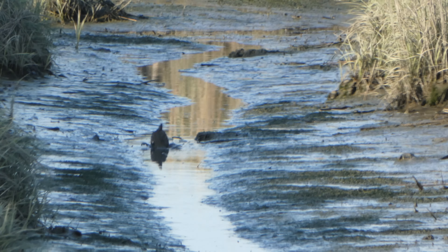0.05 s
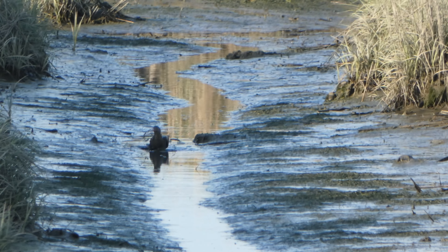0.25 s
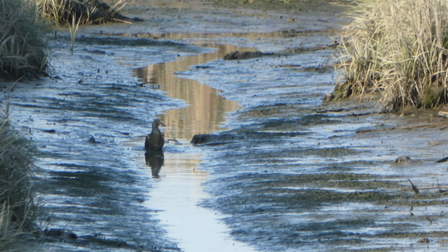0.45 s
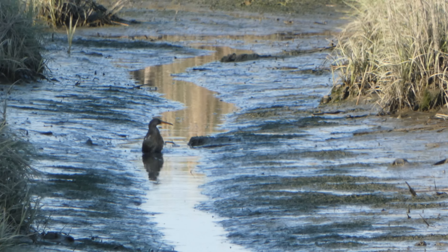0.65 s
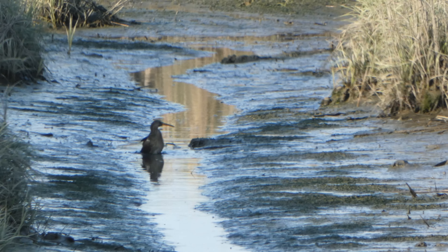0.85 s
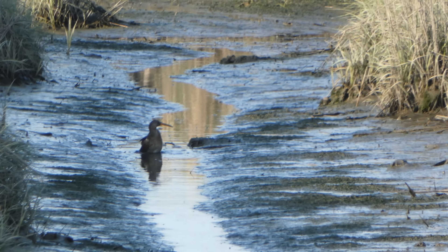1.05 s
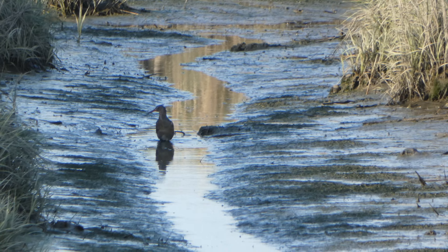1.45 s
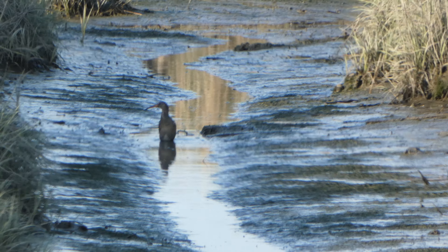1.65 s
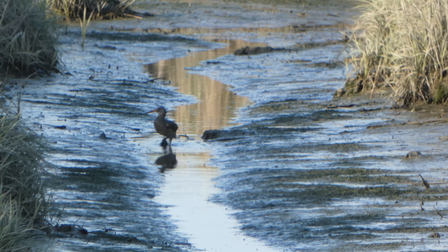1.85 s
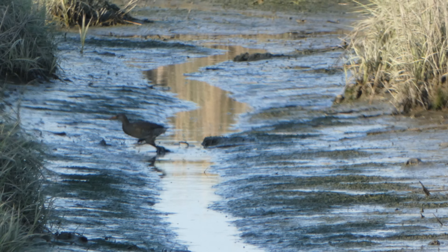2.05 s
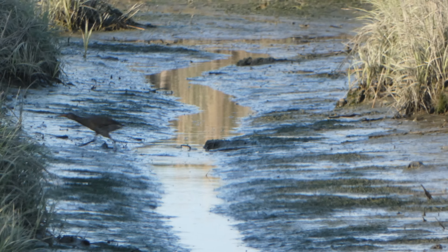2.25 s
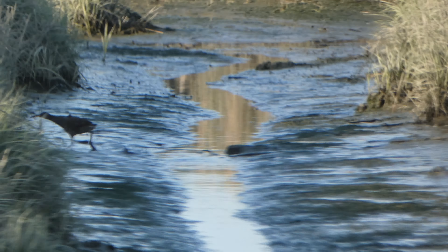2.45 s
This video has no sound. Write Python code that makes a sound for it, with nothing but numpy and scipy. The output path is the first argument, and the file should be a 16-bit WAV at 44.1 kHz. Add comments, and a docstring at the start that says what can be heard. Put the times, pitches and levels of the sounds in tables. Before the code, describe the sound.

High, clear bird whistles slide downward across a marsh, softly at first, then stronger after a spell of loud, lumpy wind on the microphone. Faint faraway calls, small nearby ticks and a soft distant rush lie behind.

```python
"""A tidal marsh, stereo microphone in the open, a soft rush in the distance throughout.
A bird opens with two thin, falling whistles that scatter off the banks; a few dry ticks sound close by.
Puffs of wind buffet the microphone, hardest around 1 s, and the recorder turns its gain down.
As the wind eases and the gain creeps back, fainter calls answer from afar.
The loudest whistle comes near 1.9 s, overlapped by a second, lower one; a last one follows at 2.4 s."""
import sys
import numpy as np
from scipy import signal
from scipy.fft import rfft, irfft, next_fast_len
from scipy.io import wavfile
from scipy.ndimage import uniform_filter1d, map_coordinates

SR = 44100
rng = np.random.default_rng(int(sys.argv[2]) if len(sys.argv) > 2 else 0)


def bounce(signal):
    """Save signal as a 16-bit WAV file at the path given by the first command-line argument."""
    frames = np.transpose(np.atleast_2d(signal))
    limited = np.clip(frames, -1, 1)
    pcm = np.round(limited * 32767).astype(np.int16)
    wavfile.write(sys.argv[1], SR, pcm)


N = 114660  # 2.6 s

WAVER_HZ, FLUTTER_DB = 16.25, 2.5  # unsteadiness of pitch and level
# Nearer whistles, one contour each; a second, lower whistle overlaps the loudest: t/s, f/Hz, level/dB
WHISTLE_CONTOURS = [
    [(0.0, 5420, -57.5), (.035, 5185, -55.5), (.14, 5004, -49), (.19, 4960, -52.5), (.26, 5104, -54.5),
     (.305, 5060, -66)],
    [(.355, 5310, -69), (.39, 5240, -62.5), (.445, 5050, -58), (.495, 4950, -76), (.535, 5040, -63.5),
     (.6, 5070, -84)],
    [(1.718, 6330, -60), (1.735, 6145, -65.5), (1.765, 5423, -47), (1.79, 5380, -59), (1.812, 5328, -40.5),
     (1.85, 5183, -50.5), (1.905, 5078, -39), (1.965, 5080, -39.5), (2.005, 5270, -53.5), (2.03, 5400, -56)],
    [(1.82, 5164, -54), (1.94, 4963, -49.5), (2.0, 4956, -52), (2.04, 4930, -69)],
    [(2.425, 5360, -67), (2.448, 5410, -53), (2.482, 5125, -64), (2.53, 5060, -55), (2.56, 5110, -54.5),
     (2.6, 5210, -56)],
]
# Where each whistle sits: left over right/dB
WHISTLE_PAN_DB = [3.5, 1.5, 1.5, -3, -6.5]
# Second and third harmonic, against the fundamental: level/dB
OVERTONES_DB = [-30, -39.5]


def whistles():
    """The nearer whistles: almost pure tones that fall, level out and mostly lift at the end."""
    out, t = np.zeros((2, N)), clock()
    for rows, pan_db in zip(WHISTLE_CONTOURS, WHISTLE_PAN_DB):
        hz, db = curves(rows)
        phase = phase_of(uniform_filter1d(hz, size=400) + WAVER_HZ * wobble(120))
        overtones = sum(amp(level) * np.sin(k * phase) for k, level in enumerate(OVERTONES_DB, 2))
        tone = np.sqrt(2) * (np.sin(phase) + overtones)
        gate = np.clip(np.minimum(t - rows[0][0], rows[-1][0] - t) / 0.0082, 0, 1)
        out += panned(tone * gate * amp(db + FLUTTER_DB * wobble(90)), pan_db)
    return out


# Puffs on the microphone: peak t/s, width/s, level/dB
PUFFS = [(0.066, 0.0081, -34.5), (0.239, 0.0067, -27.5), (0.274, 0.014, -27.5), (0.346, 0.026, -29),
         (0.392, 0.016, -29.5), (0.45, 0.025, -26.5), (0.525, 0.018, -22.5), (0.579, 0.025, -21),
         (0.652, 0.017, -20.5), (0.717, 0.048, -26.5), (0.85, 0.02, -24.5), (0.891, 0.022, -17),
         (0.935, 0.035, -23.5), (0.99, 0.032, -16), (1.044, 0.021, -16.5), (1.114, 0.025, -22.5),
         (1.205, 0.011, -31), (1.291, 0.019, -18), (1.333, 0.0087, -17.5), (1.404, 0.037, -30),
         (1.51, 0.013, -28.5), (1.653, 0.012, -25), (1.92, 0.016, -25.5), (1.97, 0.021, -34.5)]
# Low buffeting: f/Hz, density/dB
BUFFET_SPECTRUM = [(25, -42.5), (60, -7.5), (120, 3.5), (230, 0.5), (380, -8), (600, -29.5), (1000, -50.5),
                   (5000, -98.5)]
# Its stereo image: f/Hz, left-right correlation
BUFFET_IMAGE = [(60, 0.65), (150, 0.89), (300, 0.25), (600, 0.093), (1500, -0.94)]
# Brighter flurry in the strongest puffs: f/Hz, density/dB
FLURRY_SPECTRUM = [(200, -44.5), (400, 11.5), (600, 3.5), (1300, -15.5), (4000, -53)]
# Its stereo image: f/Hz, left-right correlation
FLURRY_IMAGE = [(500, -0.59)]


def wind(breeze_db=-53.5, rise_over_fall=0.77, flurry_growth=1.83):
    """Puffs of lumpy buffeting right on the microphone; the strongest turn brighter."""
    power = amp(breeze_db) ** 2
    for peak, width, level in PUFFS:
        u = (clock() - peak) / width
        power = power + amp(level) ** 2 * np.exp(-np.where(u < 0, u / rise_over_fall, u) ** 2)
    wind_db = 10 * np.log10(power)
    buffet = amp(wind_db + 2 * wobble(110)) * steadied(noise(BUFFET_SPECTRUM, BUFFET_IMAGE))
    flurry = unit(amp(3.3 * wobble(150)) * steadied(noise(FLURRY_SPECTRUM, FLURRY_IMAGE)))
    return buffet + panned(amp(6 + flurry_growth * wind_db) * flurry, pan_db=-4)


# Eddies striking the microphone: t/s, envelope peak level/dB, f/Hz
EDDIES = [(.437, -23.5, 390), (.486, -9, 169), (.522, -16, 212), (.559, -14.5, 209), (.576, -16, 470),
          (0.657, -11.5, 133), (.8805, -2.5, 273), (.977, -5.5, 640), (.993, -6.5, 328), (1.022, -16, 900),
          (1.036, -15.5, 643), (1.104, -8.5, 201), (1.293, -7.5, 414), (1.346, -8, 180), (1.92, -15.5, 217),
          (1.958, -22, 258)]


def eddy_slaps(half_width_cycles=0.3, port_lag_s=0.00041):
    """Each eddy is one swing of pressure, reaching the microphone's two ports out of step."""
    out = np.zeros((2, N))
    for centre, db, hz in EDDIES:
        cycles = (clock() - centre) * hz
        envelope = amp(db) * np.exp(1 - np.hypot(1, cycles / half_width_cycles))
        lead_cycles = np.array([[.5], [-.5]]) * port_lag_s * hz
        out += envelope * np.sin(2 * np.pi * (cycles + lead_cycles))
    return out


# Dry ticks close by: t/s, click level/dB, rustle level/dB
TICKS = [(0.14, -43.5, -54), (0.171, -40.5, -50.5), (0.655, -44, -67), (.879, -30, -46),
         (0.978, -44, -44.5), (1.254, -42.5, -50), (1.283, -51, -52), (1.654, -43.5, -50.5),
         (2.133, -41.5, -56), (2.384, -40.5, -44)]
# Colour of click and rustle: f/Hz, density/dB
TICK_SPECTRUM = [(300, -12), (1200, 10), (1800, 5.5), (2300, 8), (2800, -5), (5000, -5), (7500, -6.5),
                 (10500, -12), (15000, -25)]


def ticks(click_s=0.0023, ring_hz=2140, ring_db=-8, ring_s=0.0022, rise_s=0.0021, rustle_s=0.019):
    """Close to the microphone: a sharp click with a brief ring, then a short dry rustle."""
    click, rustle, ring = np.zeros((3, N))
    for start, click_db, rustle_db in TICKS:
        t = np.maximum(clock() - start, 0)
        click += amp(click_db) * (t > 0) * np.exp(-t / click_s)
        ring += amp(click_db + ring_db) * np.exp(-t / ring_s) * np.sin(2 * np.pi * ring_hz * t)
        rustle += amp(rustle_db) * (1 - np.exp(-t / rise_s)) * np.exp(-t / rustle_s)
    envelope = click + rustle * amp(2.8 * wobble(380))
    return ring + envelope * noise(TICK_SPECTRUM, image=[(1000, 0.67)])


# Held notes from afar: t/s, length/s, starting f/Hz, level/dB
FAR_NOTES = [(0, 0.083, 6020, -69), (0.481, .42, 3160, -71.5), (1.356, 0.35, 3095, -66.5),
             (1.569, 0.29, 3016, -60), (1.936, 0.097, 3070, -75), (1.985, 0.081, 963, -54.5),
             (2.139, 0.031, 977, -49.5), (2.2, 0.1, 3200, -74), (2.453, 0.25, 3215, -71.5)]
# Chirps from afar: t/s, final f/Hz, level/dB
FAR_CHIRPS = [(1.103, 3220, -67.5), (1.372, 3110, -66), (2.352, 3110, -60), (2.477, 3010, -67.5)]


def far_calls(sag_hz_per_s=440, chirp_rise_s=0.014, chirp_drop_hz=610):
    """Distant birds, dead centre: notes that swell, sag and die away, and chirps that drop quickly."""
    out = np.zeros(N)
    for start, length, hz, db in FAR_NOTES:
        t = np.clip(clock() - start, 0, length)
        pitch = hz - sag_hz_per_s * t + 6 * wobble(60)
        envelope = amp(db + FLUTTER_DB * wobble(20)) * np.sin(np.pi * t / length)
        out += envelope * np.sin(phase_of(pitch))
    for start, hz, db in FAR_CHIRPS:
        u = np.maximum(clock() - start, 0) / chirp_rise_s
        pitch = hz + chirp_drop_hz * np.exp(-u / 2)
        out += amp(db) * u * np.exp(1 - u) * np.sin(phase_of(pitch))
    return np.sqrt(2) * np.array([out, out])


def marsh_echoes(x, reeds_t60_s=.65, banks_t60_s=.13, far_bank_s=.028, top_hz=8200):
    """Add quick scatter and one slap from the mud banks and a wide tail from the reeds, all dulled."""
    t = np.arange(SR) / SR
    mid, side = rng.standard_normal((2, SR)) * amp(-60 * t / reeds_t60_s)
    side *= amp(0.5)
    reeds = np.array([mid + side, mid - side])
    banks = rng.standard_normal(SR) * amp(-60 * t / banks_t60_s)
    response = amp(-16) * reeds / np.linalg.norm(reeds[0]) + amp(-6.5) * banks / np.linalg.norm(banks)
    scatter = signal.fftconvolve(x, response, axes=1)[:, :N]
    slap = amp(-9) * filtered(x, lambda hz: np.exp(-2j * np.pi * hz * far_bank_s))
    return x + filtered(scatter + slap, lambda hz: 1 / np.hypot(1, (hz / top_hz) ** 2))


# Distant rush: f/Hz, density/dB
RUSH_SPECTRUM = [(20, -32.5), (122, 1), (450, -3.5), (1240, -16), (2700, -33), (5000, -45.5), (15500, -56)]
# Its slow drift: t/s, level/dB
RUSH_LEVEL = [(.2, -42), (1.5, -45), (2.2, -44.5)]
# Faint hiss: f/Hz, density/dB
HISS_SPECTRUM = [(3500, 0.5), (6500, 1.5), (8500, -3.5), (10500, -0.5), (12000, -11.5), (15500, -13)]
# Its swells: t/s, level/dB
HISS_LEVEL = [(.08, -70.5), (.16, -60.5), (.24, -73), (.39, -64.5), (.52, -69.5), (.93, -65), (.985, -66.5),
              (1.04, -71.5), (1.46, -67), (2.6, -73.5)]
# Stereo image of rush and hiss: f/Hz, left-right correlation
AIR_IMAGE = [(60, 1), (250, 0.8), (1000, 0.081), (3000, 0.39), (10000, 0.63)]


def air():
    """The distant rush of the open marsh, left of centre, and a faint, swelling hiss."""
    (rush_db,), (hiss_db,) = curves(RUSH_LEVEL), curves(HISS_LEVEL)
    rush = amp(rush_db + wobble(9.9)) * noise(RUSH_SPECTRUM, AIR_IMAGE)
    hiss = amp(hiss_db + 1.3 * wobble(200)) * noise(HISS_SPECTRUM, AIR_IMAGE)
    return panned(rush, pan_db=4.5) + hiss


def amp(db):
    """Decibels to gain."""
    return 10 ** (np.asarray(db) / 20)


def unit(x):
    """Scale to rms 1."""
    return x / np.sqrt(np.mean(x ** 2) + 1e-20)


def clock():
    """The time of each sample."""
    return np.arange(N) / SR


def phase_of(hz):
    """Running phase of a gliding pitch."""
    return 2 * np.pi * np.cumsum(hz) / SR


def along(points, hz):
    """Interpolate (f/Hz, value) points on a log axis."""
    f, values = np.transpose(points)
    return np.interp(np.log(hz + 1), np.log(f + 1), values)


def curves(rows):
    """One value per sample for each column after the time."""
    times, *columns = np.transpose(rows)
    return [np.interp(clock(), times, column) for column in columns]


def wobble(rate):
    """A smooth random curve, rate knots a second."""
    return map_coordinates(rng.standard_normal(1024), [clock() * rate], mode="mirror")


def panned(x, pan_db):
    """Make the left louder than the right by pan_db."""
    return x * amp(np.array([[.5], [-.5]]) * pan_db)


def filtered(x, response):
    """Apply a frequency response to x."""
    size = next_fast_len(N + SR // 2)
    return irfft(rfft(x, size) * response(np.fft.rfftfreq(size, 1 / SR)), size)[..., :N]


def noise(spectrum, image):
    """Coloured stereo noise of rms 1; image gives its left-right correlation by frequency."""
    def mid_side_gains(hz):
        angle = np.arccos(np.clip(along(image, hz), -1, 1)) / 2
        return amp(along(spectrum, hz)) * [np.cos(angle), np.sin(angle)]
    mid, side = filtered(rng.standard_normal((2, N)), mid_side_gains)
    return unit(np.array([mid + side, mid - side]))


def running_power(x, size):
    """Mean square of both channels over size samples."""
    return np.abs(uniform_filter1d(np.mean(x ** 2, axis=0), size))


def steadied(x):
    """Even out the slow swings in the level of a noise."""
    return x / np.sqrt(running_power(x, 900) + 1e-6)


def scene():
    """Birds across the marsh, wind and ticks at the microphone, open air behind."""
    return marsh_echoes(whistles() + far_calls()) + wind() + eddy_slaps() + ticks() + air()


def record(dry, threshold_db=-28.5, duck_share=0.31, recover_db_per_s=7, top_hz=15700):
    """The recorder's gain ducks at loud moments and recovers slowly; nothing is kept above top_hz."""
    level_db = 10 * np.log10(running_power(dry, 600) + 1e-12)
    wanted_cut_db = duck_share * np.maximum(level_db - threshold_db, 0)
    recovered_db = recover_db_per_s * clock()
    duck_db = np.maximum.accumulate(wanted_cut_db + recovered_db) - recovered_db
    return filtered(dry * amp(-duck_db), lambda hz: hz < top_hz)


dry = scene()
out = record(dry)
bounce(out)
```